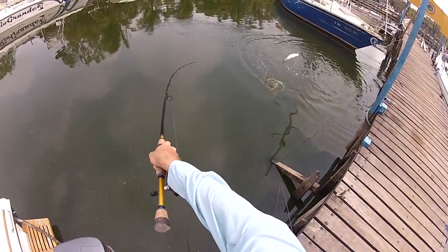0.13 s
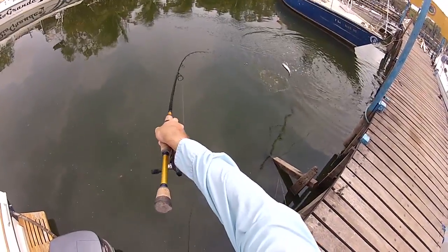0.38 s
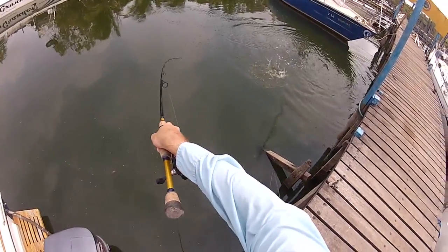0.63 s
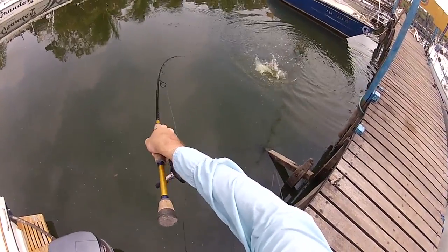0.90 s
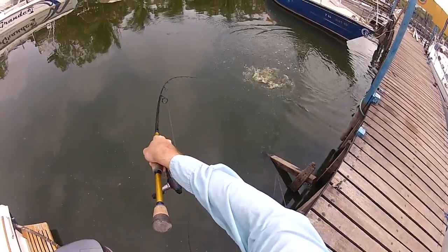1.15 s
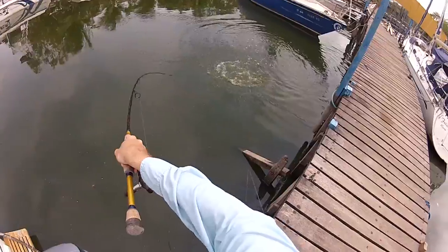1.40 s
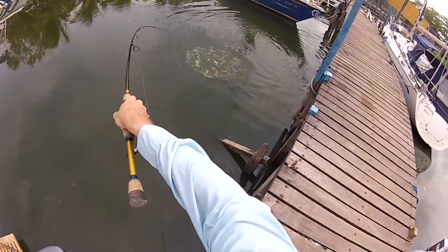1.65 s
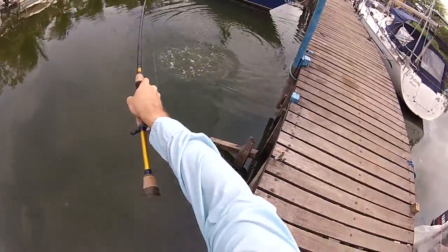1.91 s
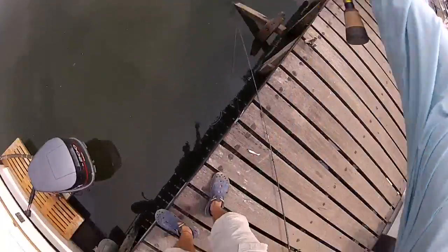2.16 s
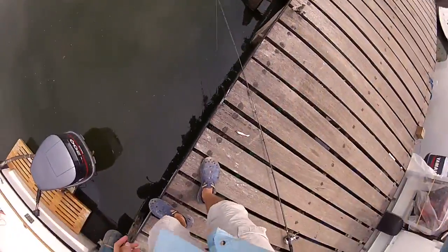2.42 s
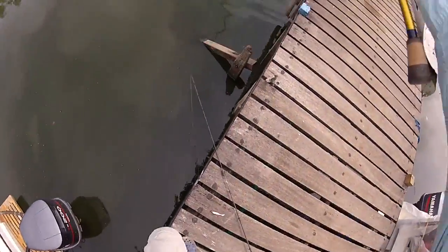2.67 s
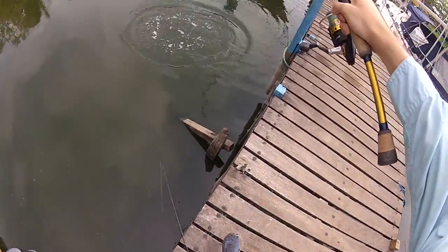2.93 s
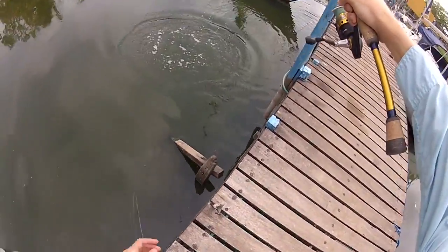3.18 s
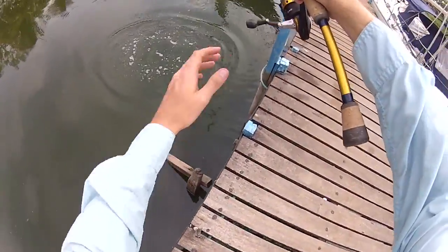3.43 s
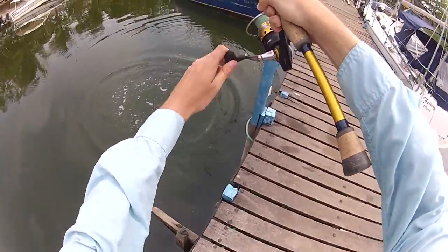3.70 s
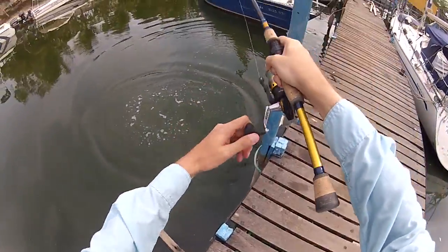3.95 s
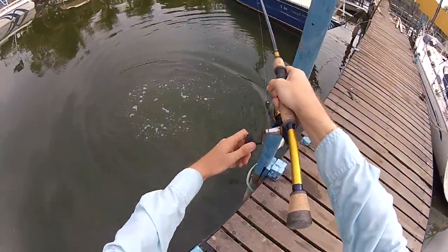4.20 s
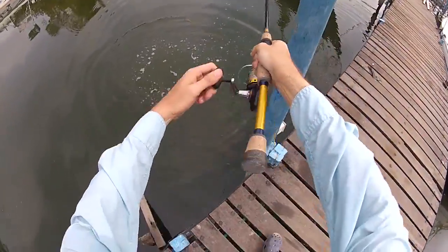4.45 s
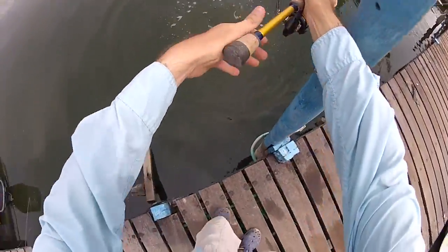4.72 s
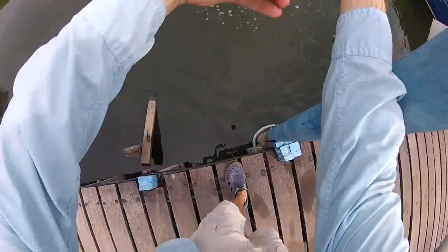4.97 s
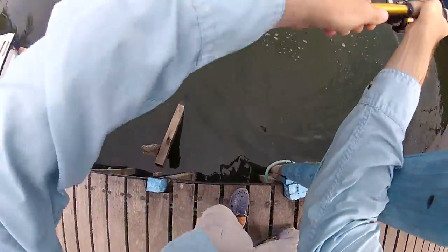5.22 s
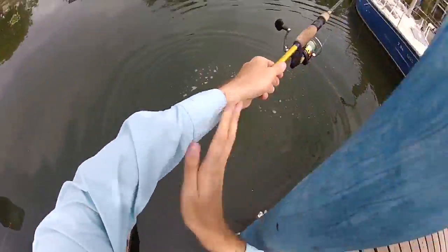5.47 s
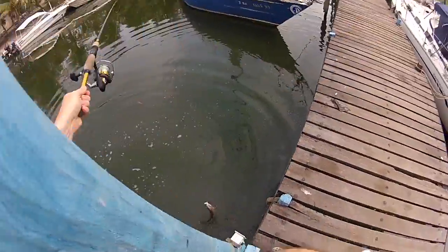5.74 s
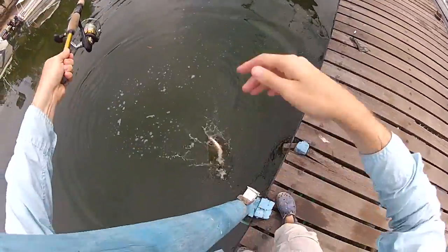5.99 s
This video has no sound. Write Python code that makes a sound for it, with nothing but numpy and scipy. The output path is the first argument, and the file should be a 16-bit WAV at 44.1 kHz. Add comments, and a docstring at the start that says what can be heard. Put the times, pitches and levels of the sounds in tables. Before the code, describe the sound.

A fish is played from a wooden dock, heard by a head-worn microphone in a sealed housing, boxy and nearly mono with grainy treble. Soft low wind rumble rises and falls throughout over faint harbour noise, distant hum and thin hiss. From 0 to 1.4 s water churns in hissing flurries, with a sharp slap at 0.5 and a weaker one near 1.0. A bump at 1.5 leads to a rapid run of bright reel ticks and scuffs at 2.0-2.1, then a woody rod tap at 2.16. After a calmer spell, a deep thud comes at 3.1, a thump with dull knocks around 3.7-3.8, and the strongest boomy bumps and knock at 4.5, with more at 4.7-4.8. From 5.2 splashing returns with a slap, bubbly plinks and scuffs; knocks at 5.5 and 5.8 precede a last cluster of rising plinks to 6.1.

```python
"""Angler's head-worn camera on a dock

A camera in a sealed plastic housing on a wooden dock, while the angler plays a fish.
Head and strap jolts thud as damped bass swings; wind and sway rumble as two noise bands.
Rod, reel and mount knock and scuff, as pushes into the housing's rings; water slaps and hisses
through vent resonances and plinks as rising sines, over far noise, two hums and a wide hiss.
The sound is sampled at a low rate and held in steps, so all of it is mirrored into the treble.
"""
import sys
import numpy as np
from scipy import signal
from scipy.fft import rfft, irfft
from scipy.io import wavfile
from scipy.ndimage import uniform_filter1d

SR = 44100
rng = np.random.default_rng(int(sys.argv[2]) if len(sys.argv) > 2 else 0)


def amp(db):
    return 10 ** (np.asarray(db, float) / 20)


def int16_out(signal):
    """Quantize to a 16-bit WAV file."""
    q = np.round(np.clip(np.atleast_2d(signal).T, -1, 1) * 32767)
    wavfile.write(sys.argv[1], SR, q.astype(np.int16))


N = 269451  # length, samples

# far noise colour: freq_hz, density_db
HARBOUR = [(59, -31), (100, -10), (182, -4.5), (212, -8.5), (368, -10.5), (681, -19.5), (976, -22.5),
           (4560, -31), (5500, -34.5), (5900, -43), (7800, -69)]
HARBOUR_RMS_DB = -60.5
# distant machinery: centre_hz, width_hz, rms_db
HUM = [(174.4, 6.8, -78), (240.7, 32, -74.5)]
# colour of the hiss that differs between the channels: freq_hz, density_db
WIDTH = [(35, -46), (60, -11), (107, -5), (179, 4.5), (556, -7.5), (4340, -10), (5900, -11), (7670, -55),
         (13000, -120)]
WIDTH_RMS_DB = -79
# wind and head sway on the housing, deep band: time_s, level_db
RUMBLE = [(0.0, -47), (1.02, -60.5), (1.35, -53), (1.58, -45), (1.97, -48.5), (2.21, -36.5), (2.5, -46),
          (3.01, -47.5), (3.11, -38.5), (3.35, -54), (3.69, -40.5), (3.9, -51), (4.15, -41.5), (4.39, -44),
          (4.53, -38), (4.85, -44.5), (4.97, -40.5), (5.3, -42.5), (6.11, -46)]
# upper band: level when the deep one is at -47 dB; slope; rms flicker
UPPER_RUMBLE_DB, UPPER_FOLLOWS_DB_PER_DB, UPPER_FLICKER_DB = -61, 0.46, 0.5

# water stirred by the fish: time_s, push_db
SPLASH = [(0.0, -81.5), (0.43, -99.5), (0.53, -81), (0.66, -82.5), (0.9, -85.5), (1.0, -80), (1.12, -84.5),
          (1.2, -82), (1.45, -94), (1.99, -91), (2.21, -86.5), (2.59, -93.5), (4.36, -88), (5.2, -92),
          (5.28, -83.5), (5.45, -81.5), (5.72, -89.5), (5.82, -82), (5.9, -85.5), (6.03, -82), (6.11, -85)]
# push into each ring group: low_db, middle_db, high_db
SPLASH_RINGS_DB = (2, -1.5, -4)
SPLASH_SPARKLE_DB = 3.33  # mean of the exponential spread of drop gains
# resonances by which airborne sound leaks in: freq_hz, gain_db, pole_decay60_s
VENT = [(288, -4.5, 0.012), (788, -10.5, 0.0059), (1256, -15.5, 0.015), (1624, -7, 0.0077),
        (2262, -6.5, 0.0087), (2440, -3, 0.0095), (3067, -9.5, 0.012), (3297, -12, 0.016),
        (3723, -14.5, 0.013), (4250, -14, 0.0058), (5410, -6.5, 0.0032)]
# fish slapping the surface: start_s, push_db
SLAPS = [(0.503, -38.5), (0.971, -54.5), (4.021, -59), (5.258, -49)]
# bubbles and drops: start_s, level_db, start_pitch_hz
PLINKS = [(5.222, -46, 2250), (5.237, -40, 520), (5.313, -50, 473), (5.335, -50, 1670), (5.354, -49, 860),
          (5.851, -46, 445), (5.926, -54, 1400), (5.983, -49.5, 860), (6.011, -43, 706), (6.03, -43, 594),
          (6.07, -51, 920)]

# jolts through the strap: start_s, peak_db, settled_pitch_hz, decay60_s
THUDS = [(1.507, -37.5, 37.4, 0.15), (2.037, -29.5, 61, 0.052), (2.17, -36.5, 25.2, 0.064),
         (3.089, -28.5, 38.1, 0.23), (3.656, -31.5, 30.2, 0.23), (3.685, -31, 67, 0.096),
         (3.701, -21.5, 28, 0.054), (3.765, -37.5, 80.6, 0.081), (4.141, -31.5, 39.2, 0.25),
         (4.28, -34.5, 43, 0.087), (4.474, -31.5, 42.2, 0.17), (4.496, -22.5, 37.8, 0.25),
         (4.524, -27, 26.6, 0.22), (4.665, -30.5, 36.6, 0.11), (4.724, -34.5, 67, 0.078),
         (4.811, -34, 69.2, 0.071), (5.479, -33, 72.4, 0.12), (5.813, -31.5, 51.6, 0.036),
         (5.829, -31.5, 41.2, 0.11)]
# brief scuffs: start_s, push_db, brightness_db (per step of ring group), length_ms
SCUFFS = [(0.466, -79.5, -3, 12), (0.615, -88, 3, 12), (2.005, -84, 5, 7.9), (2.069, -76.5, -2.2, 26),
          (2.091, -70, 11, 16), (2.132, -73.5, -7.5, 37), (2.967, -79.5, -5.5, 21), (4.46, -80, -8.5, 37),
          (4.605, -69, -12, 6.8), (4.607, -68.5, 7, 18.3), (4.782, -83, -2, 14), (5.253, -79.5, 3, 48),
          (5.409, -70, 9.5, 21.5), (5.44, -84, 4, 15), (5.488, -78.5, 0, 8.7), (5.59, -73, 3, 27),
          (5.795, -87, 5.5, 86), (5.906, -89, 9.5, 23), (6.029, -77.5, -1, 20)]
# dull knocks of the mount: start_s, push_db
DULL_KNOCKS = [(3.671, -34.5), (3.837, -38), (4.517, -24.5), (4.719, -41.5), (4.803, -28.5), (4.83, -39),
               (5.478, -32.5), (5.799, -38.5), (5.818, -37.5)]
# woody taps of the rod: start_s, push_db
WOODY_KNOCKS = [(2.159, -29.5), (2.263, -42.5), (2.447, -46), (3.063, -46), (4.524, -39), (5.83, -47)]
# bright ticks of the reel: start_s, push_db
BRIGHT_KNOCKS = [(2.0184, -45.5), (2.0271, -48), (2.039, -54), (2.052, -57), (2.059, -59), (2.063, -57),
                 (2.073, -55), (2.078, -64), (2.084, -68), (2.096, -45), (3.543, -57.5), (4.142, -51),
                 (5.6, -50.5)]
# what a dull knock excites: low_db, middle_db, high_db
DULL = (0, -24, -37)
# what a woody knock excites: low_db, middle_db, high_db
WOODY = (0, -7, -30)
# what a bright knock excites: low_db, middle_db, high_db
BRIGHT = (-5, -2, 5)
# chatter as a share of the blow: dull, woody, bright
CHATTER = (0.078, 0.084, 0.03)
# rings of the housing: freq_hz, gain_db, pole_decay60_s
HOUSING = [(422, -20.5, 0.014), (734, -21.5, 0.014), (1064, -7.5, 0.0072), (1346, -16, 0.0056),
           (1835, -5, 0.0068), (2380, -1, 0.0077), (3324, -22, 0.01), (3824, 1.5, 0.0031),
           (4324, -7.5, 0.0058), (5030, -13, 0.006), (5820, -14, 0.0042)]
# borders of the ring groups: low_to_middle_hz, middle_to_high_hz
GROUP_EDGES_HZ = [1750, 2900]

HELD_RATE_HZ, STEPS = 12000, 4
TOP_HZ = 15100


def unit(x):
    """Scale to rms 1."""
    return x / np.sqrt(np.mean(x ** 2))


def curve(table):
    """Columns of a table as per-sample lines."""
    time_s, *columns = np.transpose(table)
    return [np.interp(np.arange(N) / SR, time_s, column) for column in columns]


def band(lo_hz, hi_hz):
    """Noise in a band, rms 1."""
    sos = signal.butter(2, [lo_hz, hi_hz], "band", fs=SR, output="sos")
    return unit(signal.sosfilt(sos, rng.standard_normal(N)))


def coloured(spectrum):
    """Steady noise of a given colour, rms 1."""
    hz, db = np.transpose(spectrum)
    f = np.arange(N // 2 + 1) * SR / N + 1  # + 1 keeps the log finite
    gain = amp(np.interp(np.log(f), np.log(hz), db))
    return unit(irfft(rfft(rng.standard_normal(N)) * gain, N))


def walk(rate_hz):
    """Random levels held 1 / rate_hz and slewed twice, rms 1."""
    k = int(SR / rate_hz)
    held = np.repeat(rng.standard_normal(N // k + 1), k)
    return unit(uniform_filter1d(uniform_filter1d(held, k), k)[:N])


def add(track, start_s, x):
    """Lay a short sound on a track."""
    i = int(start_s * SR)
    track[..., i:i + x.shape[-1]] += x[..., :N - i]


def ring(pushes, modes):
    """Double-pole modes: each swells and dies after the push of its group (low, middle, high)."""
    out = np.zeros(N)
    for hz, db, decay60_s in modes:
        pole = np.exp(2j * np.pi * hz / SR - np.log(1000) / (decay60_s * SR))
        push = pushes[np.searchsorted(GROUP_EDGES_HZ, hz)]
        swing = signal.lfilter([1], [1, -2 * pole, pole ** 2], push).imag
        out += amp(db) * np.e * (1 - abs(pole)) * swing  # envelope peak near amp(db) per unit push
    return out


def harbour():
    """Smooth, level far noise with two faint hums."""
    hums = sum(amp(db) * band(hz - width_hz / 2, hz + width_hz / 2) for hz, width_hz, db in HUM)
    return amp(HARBOUR_RMS_DB) * coloured(HARBOUR) + hums


def widen(x):
    """A faint steady hiss of opposite sign in the two channels."""
    return x + amp(WIDTH_RMS_DB) * coloured(WIDTH) * np.array([[1], [-1]])


def rumble():
    """Two bands of buffeting that swell with the movement; the upper follows less and flickers."""
    deep_db, = curve(RUMBLE)
    upper_db = UPPER_RUMBLE_DB + UPPER_FOLLOWS_DB_PER_DB * (deep_db + 47)
    upper_db = upper_db + UPPER_FLICKER_DB * walk(7.3)
    return amp(deep_db) * band(17.2, 40.4) + amp(upper_db) * band(41.7, 99.3)


def splash():
    """Dense droplets of uneven size, in flurries partly shared and partly per ring group."""
    db, = curve(SPLASH)
    drops = rng.standard_normal(N) * amp(SPLASH_SPARKLE_DB * rng.exponential(size=N))
    flurries_db = 1.6 * walk(90) + 1.3 * np.array([walk(45) for _ in range(3)])
    return unit(drops) * amp(db + np.array(SPLASH_RINGS_DB)[:, None] + flurries_db)


def scuffs():
    """A gritty slide that swells and fades, catching and slipping every few milliseconds."""
    pushes, t = np.zeros((3, N)), np.arange(5000) / SR
    for start_s, db, bright_db, length_ms in SCUFFS:
        hump = np.sin(np.pi * np.clip(1000 * t / length_ms, 0, 1) ** 0.92) ** 1.74
        slips_db = np.repeat(rng.standard_normal(50), 100)  # held 100 samples each
        group_gain = amp(db + bright_db * np.arange(-1, 2))[:, None]
        grit = rng.standard_normal((3, len(t)))
        add(pushes, start_s, group_gain * grit * amp(slips_db) * hump)
    return pushes


def slaps():
    """A sharp smack with spray falling after it."""
    track, t = np.zeros(N), np.arange(4000) / SR
    for start_s, db in SLAPS:
        spray = 0.1 * np.exp(-t / 0.0025) + 0.015 * np.exp(-t / 0.031)
        push = rng.standard_normal(len(t)) * spray
        push[0] = 1
        add(track, start_s, amp(db) * push)
    return track


def thuds():
    """Each jolt swings the housing on its strap, fast at first while the strap is taut."""
    out, t = np.zeros(N), np.arange(SR // 3) / SR
    for start_s, db, hz, decay60_s in THUDS:
        turns = hz * (t + 0.5 * 0.0089 * (1 - np.exp(-t / 0.0051)))
        envelope = np.exp(-np.log(1000) * t / decay60_s) * (1 - np.exp(-t / 0.014))
        swing = np.sin(2 * np.pi * turns) * envelope
        add(out, start_s, amp(db) * swing / np.abs(swing).max())
    return out


def knocks():
    """One sharp contact, then a few milliseconds of chatter."""
    pushes, t = np.zeros((3, N)), np.arange(400) / SR
    tables = [DULL_KNOCKS, WOODY_KNOCKS, BRIGHT_KNOCKS]
    for rings_db, chatter, table in zip([DULL, WOODY, BRIGHT], CHATTER, tables):
        for start_s, db in table:
            push = chatter * rng.standard_normal(len(t)) * np.exp(-t / 0.0028)
            push[0] = 1
            add(pushes, start_s, np.outer(amp(db + np.array(rings_db)), push))
    return pushes


def plinks():
    """A bubble sings a few cycles, rising as it nears the surface."""
    out, t = np.zeros(N), np.arange(1500) / SR
    for start_s, db, hz in PLINKS:
        song = np.sin(2 * np.pi * hz * t * (1 + 6 * t))
        envelope = np.exp(-t / 0.0028) * (1 - np.exp(-t / 0.0011))
        add(out, start_s, amp(db) * song * envelope)
    return out


def scene():
    """One microphone feeds both channels; the wide hiss is added last."""
    water = ring(splash() + slaps(), VENT) + plinks()
    handling = ring(knocks() + scuffs(), HOUSING)
    return widen(handling + water + rumble() + thuds() + harbour())


def roll_off(x):
    """The treble ends steeply here."""
    return signal.sosfilt(signal.butter(12, 16130, fs=SR, output="sos"), x)


def record(dry):
    """Sampled slowly, each sample held for several steps: images appear about the slow rate."""
    slow = signal.resample_poly(dry, HELD_RATE_HZ, SR, axis=1)
    steps = np.repeat(slow, STEPS, axis=1)
    held = signal.resample_poly(steps, SR, HELD_RATE_HZ * STEPS, axis=1)[:, :N]
    low_pass = signal.ellip(8, .5, 60, TOP_HZ, fs=SR, output="sos")
    return roll_off(signal.sosfilt(low_pass, held))


dry = scene()
out = record(dry)
int16_out(out)
```